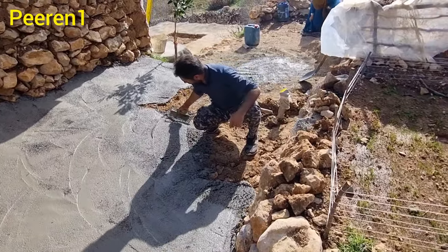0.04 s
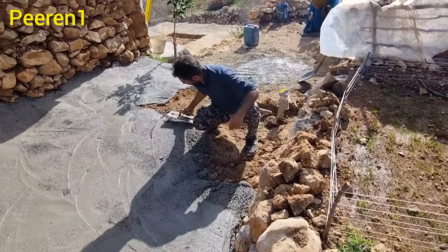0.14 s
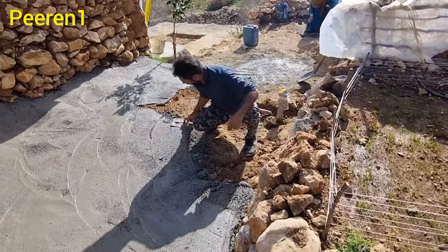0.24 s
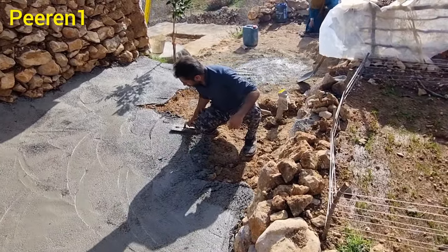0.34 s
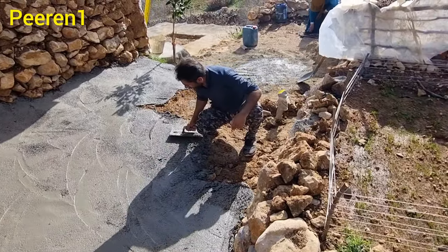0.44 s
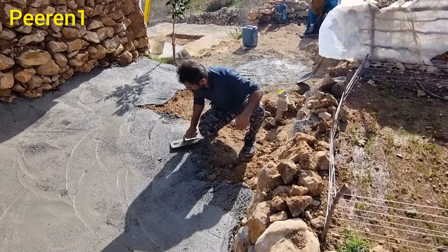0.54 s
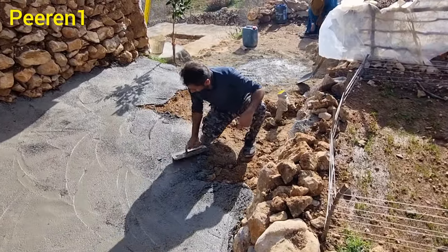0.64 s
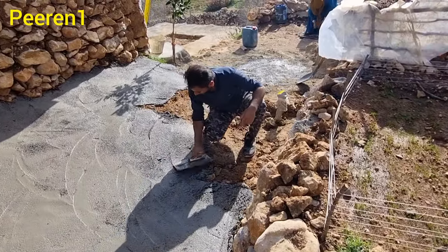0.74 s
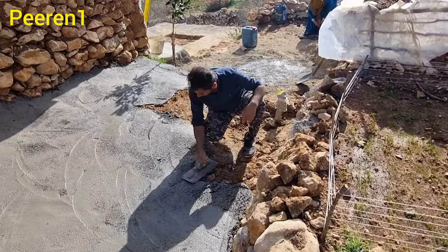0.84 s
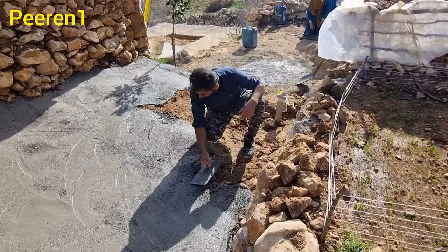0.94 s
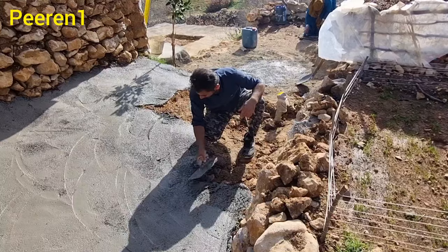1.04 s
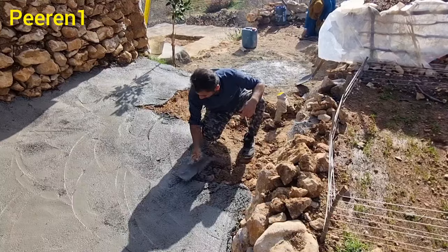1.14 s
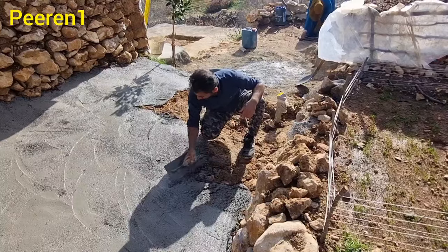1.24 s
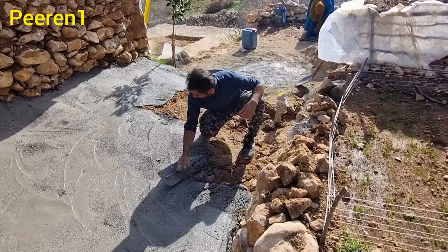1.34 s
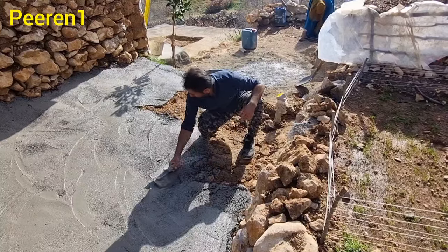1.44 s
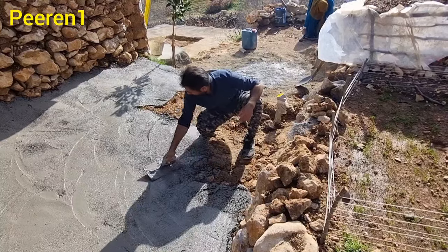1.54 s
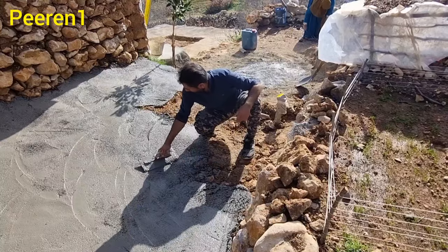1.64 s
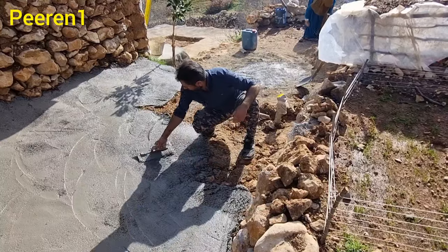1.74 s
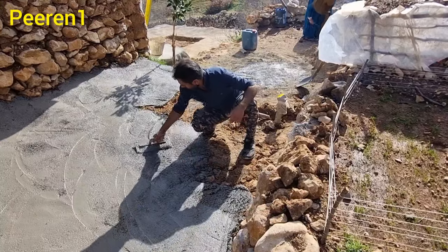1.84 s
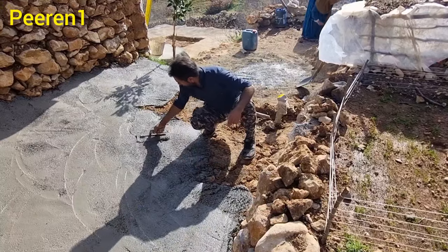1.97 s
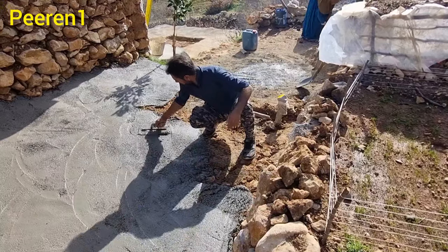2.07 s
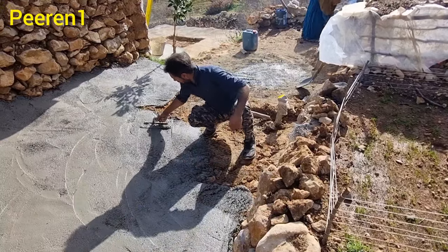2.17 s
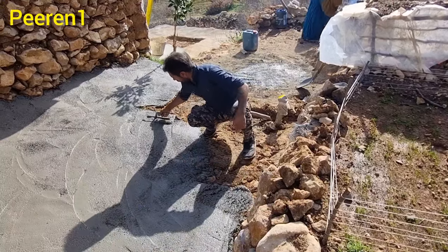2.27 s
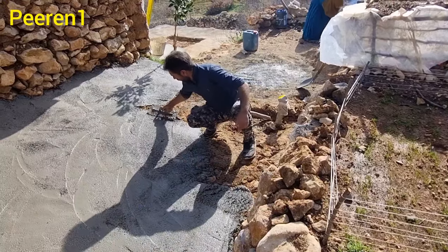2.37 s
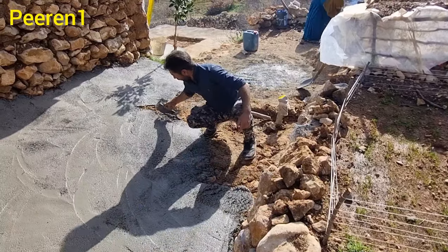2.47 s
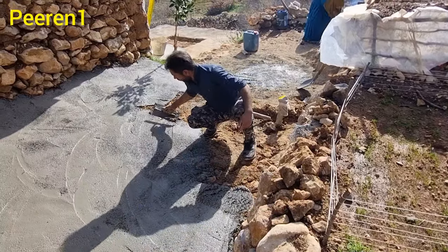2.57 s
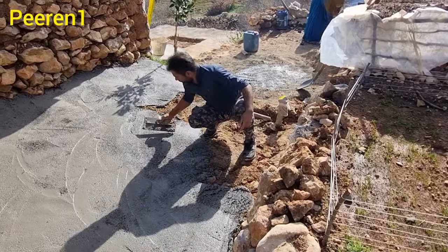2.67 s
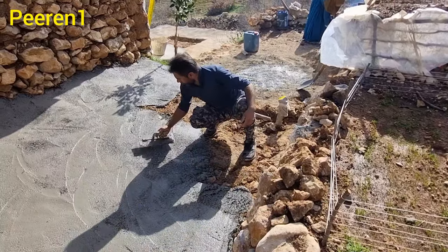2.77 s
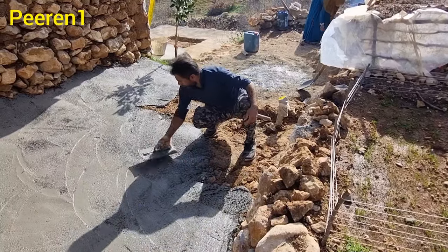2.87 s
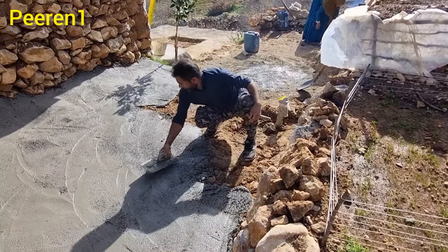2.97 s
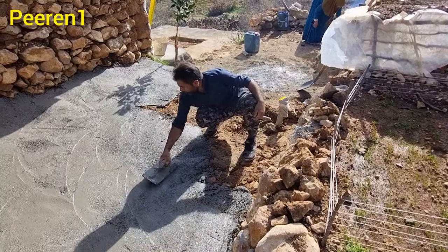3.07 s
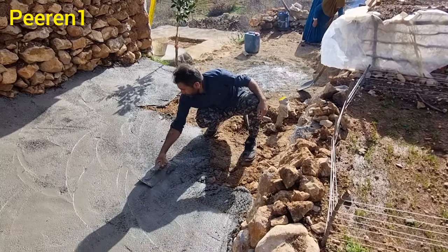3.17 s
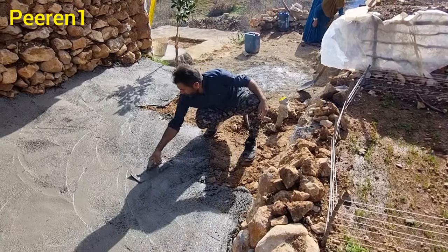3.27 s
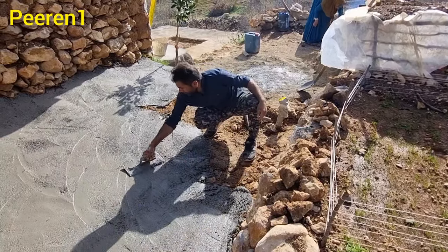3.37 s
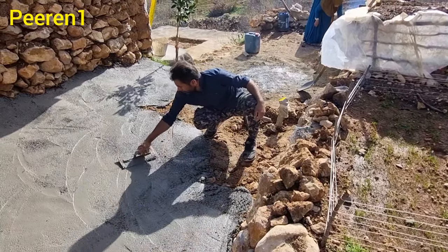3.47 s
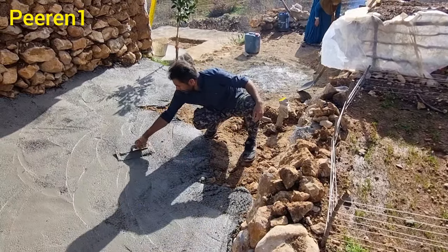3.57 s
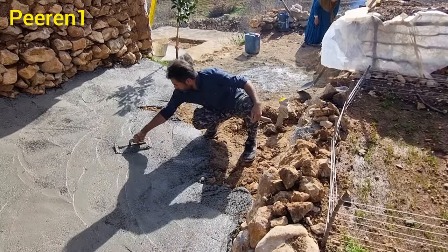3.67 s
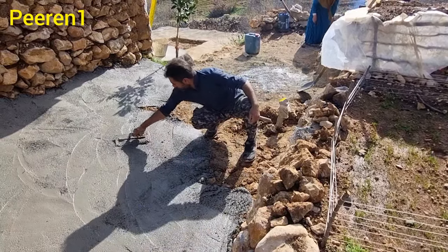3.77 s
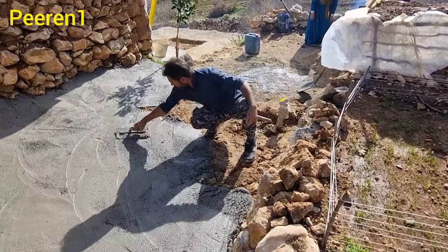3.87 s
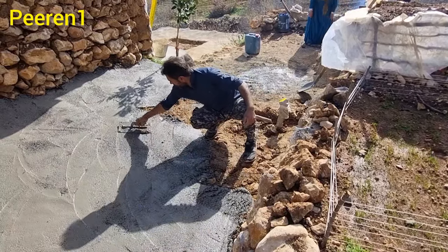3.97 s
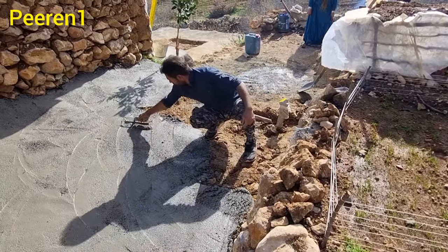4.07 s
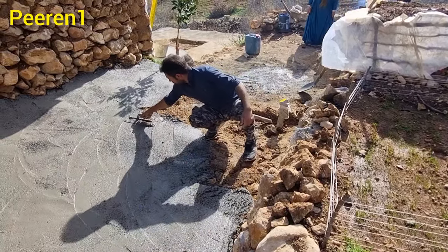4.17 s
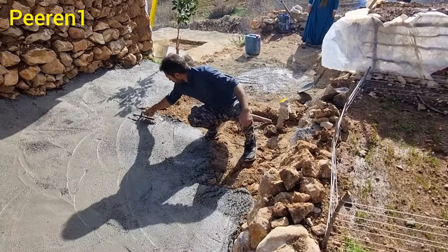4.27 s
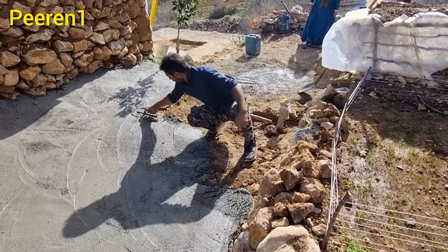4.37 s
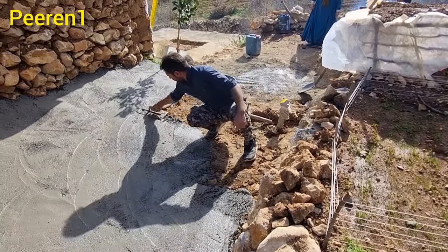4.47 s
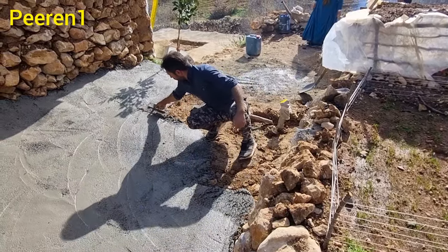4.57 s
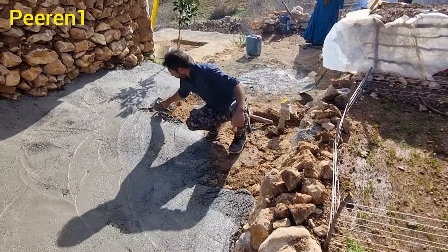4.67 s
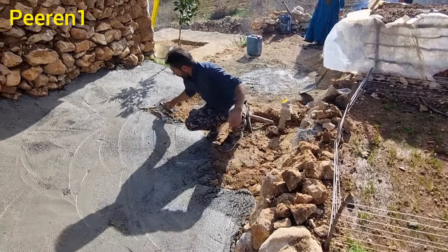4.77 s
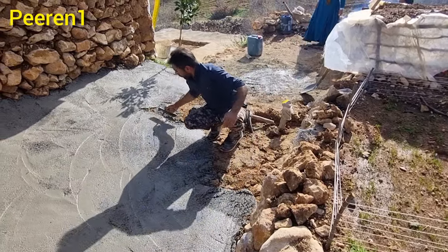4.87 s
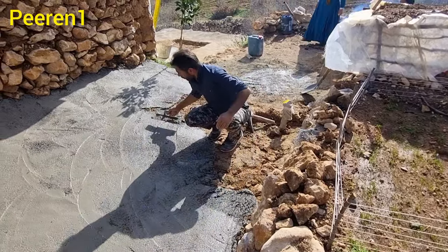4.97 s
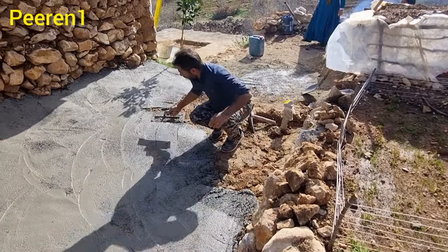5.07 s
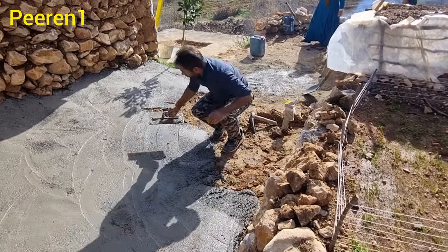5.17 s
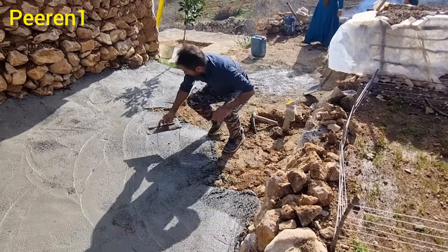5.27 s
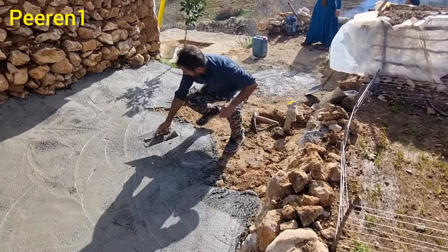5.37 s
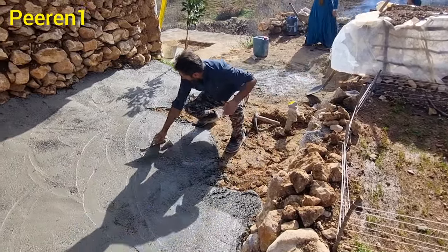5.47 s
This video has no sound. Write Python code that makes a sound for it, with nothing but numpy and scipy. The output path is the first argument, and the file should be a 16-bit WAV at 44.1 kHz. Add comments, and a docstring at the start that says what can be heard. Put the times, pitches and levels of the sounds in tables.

```python
"""A steel trowel sweeps wet cement outdoors, a few metres from two microphone ports.
Over a distant rumble, low hum and thin hiss (shaped noise), one sweep ends and another follows: random
clicks, as of sand grains, pass through blade-shaped bands. After faint rustles and tinkles a third sweep
follows; then the lifted steel tinkles, as decaying tones struck at random, until the hand stills it.
A fourth long sweep and more rustles follow; at the end the blade slaps down with a snap and dull thumps."""
import sys
import numpy as np
from scipy import signal
from scipy.fft import rfft, irfft
from scipy.io import wavfile
from scipy.ndimage import uniform_filter1d

SR = 44100
rng = np.random.default_rng(int(sys.argv[2]) if len(sys.argv) > 2 else 0)


def master(y):
    """Save y as 16-bit WAV."""
    cut = np.clip(np.atleast_2d(y).T, -1, 1)
    pcm = np.round(cut * 32767)  # scale
    wavfile.write(sys.argv[1], SR, pcm.astype(np.int16))


N = 242991  # length [samples]
HOP, SIZE = 128, 512  # step and length of a short analysis frame [samples]
HZ = np.fft.rfftfreq(SIZE, 1 / SR)[:, None]  # the pitches inside a frame [Hz]


def gain_of(db):
    """Turns decibels into a plain multiplier."""
    return 10 ** (np.asarray(db) / 20)


def evened(x, axis=None):
    """Scales a signal so that its average strength (rms) is 1."""
    return x / np.sqrt(np.mean(x ** 2, axis, keepdims=True) + 1e-20)


def read(points, hz):
    """Reads a table between its points, on a log-frequency axis."""
    f, value = np.transpose(points)
    return np.interp(np.log(hz + 1), np.log(f + 1), value)


def add(mix, s, sound):
    """Mixes a stereo sound in, starting at s seconds."""
    part = mix[:, round(s * SR):][:, :sound.shape[1]]
    part += sound[:, :part.shape[1]]


def bell(hz, centre_hz, octaves):
    """A bell-shaped band: 1 at its centre, fading by musical distance."""
    return np.exp(-.5 * (np.log2((hz + 1) / centre_hz) / octaves) ** 2)


def swell(t, top_s, rise_s, fall_s):
    """A smooth rise to 1 at top_s and a smooth fall."""
    return np.exp(-.5 * ((t - top_s) / np.where(t < top_s, rise_s, fall_s)) ** 2)


def patches(shape, bins, frames):
    """Random blotches over frequency and time, rms 1."""
    wide = uniform_filter1d(rng.standard_normal(shape), size=bins, axis=0)
    return evened(uniform_filter1d(wide, size=frames, axis=1))


# colour of each microphone port: (frequency [Hz], level [dB])
LEFT = [(450, -11), (650, 6), (950, 1.5), (1450, -1), (1850, 0), (2250, -3), (3300, 1.6), (5000, 4),
        (5900, -2.5), (8000, 3), (9000, -13), (10200, -11.5), (12500, -8.5), (15500, -6)]
RIGHT = [(450, -10.5), (650, 2.8), (950, 1), (1650, -4.5), (2200, 1), (3200, -6), (4800, 4), (6800, -4),
         (8100, -0.1), (9600, -7), (11400, -6.5), (12900, -0.3), (14500, -4.5), (15500, -6.5)]


def ports(hz):
    """How strongly the left and right port pass each frequency."""
    return gain_of([read(LEFT, hz), read(RIGHT, hz)])


def heard(shape):
    """A spectrum as both ports colour it, average power 1 in every frame."""
    both = shape * ports(HZ)
    return both / np.sqrt(np.mean(both ** 2, (0, 1), keepdims=True))


# how alike the two ports hear the blade: (frequency [Hz], likeness [0 to 1])
SAME = [(300, .9), (900, .93), (1500, .7), (2200, .7), (3600, .35), (5000, .55), (6500, .3), (8400, .5),
        (11000, .3)]
# how far the left port is ahead: (frequency [Hz], lead [radians])
LEAD = [(0, 0.45), (1000, 1.14), (1500, 1.9), (1900, 0.04), (2500, 3.5), (4000, 9.5), (5200, 10.17),
        (8300, 16.87), (16000, 28.7)]


def pair(z):
    """Second port: partly the same sound a little later, partly sound from other paths."""
    same = np.clip(read(SAME, HZ), 0, 1)
    late = np.exp(-1j * np.interp(HZ, *np.transpose(LEAD)))
    return np.array([z[0], same * late * z[0] + np.sqrt(1 - same ** 2) * z[1]])


def grains(n, per_s, spread_db, hiss):
    """Spectra of two trains of clicks of uneven size over a bed of finer sand (steady noise)."""
    size = gain_of(spread_db * np.minimum(rng.exponential(1, (2, n)), 5))
    size = size * rng.choice([-1, 1], (2, n))
    clicks = evened(size * (rng.random((2, n)) < per_s / SR))
    x = clicks + hiss * rng.standard_normal((2, n))
    return signal.stft(evened(x), nperseg=SIZE, noverlap=SIZE - HOP)[2]


# colour of the thin hiss, before it is set to AIR_DB: (frequency [Hz], relative level [dB per Hz])
AIR = [(76, -17.5), (130, -13.5), (206, -12), (263, -14), (321, -14), (443, -24), (586, -19), (635, -23.5),
       (1260, -27.5), (2390, -26), (2920, -28), (3430, -29.5), (15800, -22.5)]
AIR_DB = -74.5  # hiss level [dB]
# how alike the two ports hear the background: (frequency [Hz], likeness [0 to 1])
AIR_SAME = [(60, .94), (250, 0.68), (700, 0.21), (1400, .1)]
# background balance: (frequency [Hz], left minus right [dB])
AIR_BALANCE = [(50, 6), (125, 6.5), (250, 0.5), (500, -1)]
# the rumble coming and going: (time [s], level [dB])
RUMBLE = [(0.0, -65), (0.07, -74), (0.35, -59.5), (0.46, -73), (0.64, -57), (0.72, -68.5), (0.81, -58),
          (0.95, -71), (1.41, -66.5), (2.52, -66.5), (3.13, -76), (3.56, -64.5), (4.16, -68), (4.68, -78.5),
          (4.74, -68), (5.11, -84), (5.27, -70), (5.405, -77), (5.435, -58), (5.51, -64)]
# colour of the rumble before its level is set: (frequency [Hz], relative level [dB per Hz])
RUMBLE_TONE = [(12, -60), (20, -17), (43, -2), (59, 4), (124, -3.5), (170, -18.5), (220, -39), (370, -120)]
HUM_HZ, HUM_SHARE = 60.6, 0.43  # wavering hum in the rumble: centre [Hz], gain added to its colour


def air():
    """Noise filtered into a swelling distant rumble with a low hum, and a thin hiss."""
    hz, frames = np.fft.rfftfreq(4096, 1 / SR)[:, None], N // 1024 + 5
    a, b, c, d = rng.standard_normal((frames, len(hz), 4)).T
    same, left = np.clip(read(AIR_SAME, hz), 0, 1), a + 1j * b
    z = np.array([left, same * left + np.sqrt(1 - same ** 2) * (c + 1j * d)])
    left_gain, right_gain = ports(hz)
    side = np.sqrt(left_gain / right_gain) * gain_of(read(AIR_BALANCE, hz) / 2)
    z *= np.array([side, 1 / side])
    hiss = gain_of(read(AIR, hz) + 1.85 * patches(left.shape, bins=40, frames=3))
    hiss *= ports(np.maximum(hz, 4000)).mean(0)  # the ports colour the treble hiss too
    rumble = gain_of(read(RUMBLE_TONE, hz)) + HUM_SHARE / (1 + ((hz - HUM_HZ) / 7) ** 2)
    rumble_db = np.interp(np.arange(N) / SR, *np.transpose(RUMBLE))
    mix = 0
    for db, colour in ((AIR_DB, hiss), (rumble_db, rumble)):
        layer = signal.istft(z * colour, nperseg=4096, noverlap=3072)[1][:, :N]
        mix = mix + gain_of(db) * evened(layer)
    return mix


# faint rustles between strokes:
# (loudest time [s], level [dB], rise [s], fall [s], low scuff relative to the crackle [dB])
RUSTLES = [(1.05, -75.5, .12, .1, -20), (1.22, -67, 0.14, 0.066, -34), (1.388, -69, 0.019, 0.025, -39),
           (2.95, -75, 0.039, 0.033, -30), (3.075, -78, 0.059, .03, -20), (4.7, -76, 0.026, 0.025, -6),
           (4.78, -75, 0.037, 0.031, -4), (5.046, -76, 0.058, 0.046, -9), (5.259, -76, .05, .15, -15),
           (5.41, -75, 0.065, .02, -14)]


def rustle(top_s, db, rise_s, fall_s, scuff_db):
    """Light crackle of cloth and gravel as the worker shifts: clicks in a wide treble band."""
    z = grains(SR, per_s=1100, spread_db=2.0, hiss=1.2)
    crackle = heard(bell(HZ, 5670, 1.0) + .5 * bell(HZ, 9000, 0.75))
    scuff = gain_of(scuff_db) * heard(bell(HZ, 1800, 0.14))
    shape = (crackle + scuff) * gain_of(2.7 * patches(z.shape[1:], bins=12, frames=12))
    x = signal.istft(z * shape, nperseg=SIZE, noverlap=SIZE - HOP)[1][:, :SR]
    return top_s - .5, x * gain_of(db) * swell(np.arange(SR) / SR, 0.503, rise_s, fall_s)


def burst(s, db, t60, shape, apart):
    """A puff of coloured noise that dies by 60 dB in t60 s; apart sets how unlike the ports hear it."""
    t = np.arange(SR // 4) / SR
    x = rng.standard_normal((1, len(t))) + apart * rng.standard_normal((2, len(t)))
    x = evened(irfft(rfft(x) * shape(np.fft.rfftfreq(len(t), 1 / SR)), len(t)))
    onset = np.minimum(t / (.03 * t60), 1)
    return s, gain_of(db - 60 * t / t60) * x * onset


# dull thumps: (time [s], level the decay starts from [dB], time to fall 60 dB [s])
THUMPS = [(1.53, -56, 0.051), (2.346, -60, 0.13), (2.51, -62.5, 0.17), (4.749, -56.5, 0.1),
          (5.414, -49.5, 0.11), (5.437, -57.5, 0.25), (5.448, -65, 0.077)]


def thump(s, db, t60):
    """A dull thump through the ground: a dying puff of bass noise."""
    return burst(s, db, t60, lambda f: bell(f, 148, 0.72), apart=0.51)


# snaps: (time [s], level the decay starts from [dB], centre [Hz], time to fall 60 dB [s])
SNAPS = [(2.312, -29.5, 5800, 0.0077), (5.3263, -54, 3630, 0.01), (5.4206, -37, 7840, 0.014)]


def snap(s, db, centre_hz, t60):
    """A stone snapping under the edge: a very short puff of bright noise."""
    return burst(s, db, t60, lambda f: ports(f) * bell(f, centre_hz, 0.45), apart=1.6)


# bursts of tinkling steel: (time [s], level before ring and hiss are blended [dB],
# length scale of the chatter [s], centre [Hz], favoured mode [Hz], ring time factor of that mode)
TINKLES = [(1.313, -78, .01, 8500, 8274, 0.55), (1.384, -63.5, .01, 9180, 9544, .5),
           (1.387, -67, 0.0093, 11000, 13845, .5), (1.457, -53, 0.0078, 9150, 9544, 0.25),
           (2.486, -43.5, 0.038, 8400, 8600, 0.2), (2.507, -62, 0.017, 4230, 4586, 0.3),
           (2.501, -59, 0.024, 2440, 2290, 0.85), (2.502, -55, 0.014, 3630, 3500, 1.7),
           (2.54, -48.5, 0.029, 8050, 8274, 0.33), (2.558, -56.5, 0.056, 5500, 5130, 1.9),
           (2.635, -57, 0.068, 5600, 4100, 1.8), (2.672, -59, 0.02, 11200, 9377, 0.62),
           (2.677, -65, 0.13, 5800, 8274, 0.88), (2.787, -63, 0.0072, 10300, 9900, 0.54),
           (2.788, -61.5, 0.082, 5970, 5020, 3.5), (2.849, -60.5, 0.006, 11800, 13800, 5.4),
           (2.912, -65, 0.01, 8700, 8274, 1)]
# tones (modes) of the free blade, before each burst picks among them:
# (frequency [Hz], relative level [dB], time to fall 60 dB before the ring time factor [s])
STEEL = [(2290, -9, 0.1), (2650, -12, 0.1), (3332, -11, 0.25), (3418, -7, 0.25), (3929, -5, 0.25),
         (4231, -11, 0.25), (4586, -7, 0.25), (4936, 0, 0.25), (5044, -2, 0.25), (5302, -11, 0.25),
         (5722, -5, 0.25), (5840, -10, 0.25), (5953, -11, 0.25), (6120, -8, 0.25), (6745, -11, 0.25),
         (7100, -10, 0.25), (7332, -6, 0.25), (7671, -10, 0.25), (8274, -1, 0.25), (8650, -12, 0.25),
         (8801, -4, 0.25), (9377, -9, 0.25), (9544, -6, 0.25), (9733, -8, 0.25), (10276, -7, 0.25),
         (10524, -8, 0.25), (10858, -11, 0.25), (11084, -12, 0.25), (12796, -13, 0.25), (13571, -13, 0.25),
         (13845, -2, 0.25)]
TICK_OCTAVES, RATTLE_OCTAVES = 0.18, 0.94  # a short tick wakes few modes, a long rattle wakes many
RATTLE_S = 0.023  # chatter longer than this counts as a rattle [s]
OTHERS_RING = 0.74  # ring time factor of the modes that a burst does not favour
GRIP_S = 2.95  # the hand tightens and stills the steel [s]


def tinkle(s, db, length, centre_hz, favoured_hz, ring_time):
    """A short chatter rings the free steel; every mode is pinged at its own moments."""
    weak = rng.uniform((2200, -18, .12), (15700, -11, .22), (14, 3))  # a thin plate has many lesser modes
    hz, mode_db, t60 = np.vstack([STEEL, weak]).T[:, :, None]
    octaves = TICK_OCTAVES + (RATTLE_OCTAVES - TICK_OCTAVES) / (1 + (RATTLE_S / length) ** 10)
    t = np.arange(SR // 3) / SR
    chatter = (t / length) ** 3 * np.exp(-4 * t / length)

    strength = gain_of(mode_db) * (bell(hz, centre_hz, octaves) + 0.9 * bell(hz, favoured_hz, 0.011))
    struck = rng.random((len(hz), len(t))) < 900 / SR  # about 900 pings a second for each mode
    pings = chatter * rng.standard_normal((len(hz), len(t))) * struck
    ring_factor = OTHERS_RING + (ring_time - OTHERS_RING) * bell(hz, favoured_hz, 0.085)
    one_ping = gain_of(-60 * t / (t60 * ring_factor)) * np.exp(2j * np.pi * hz * t)
    modes = signal.fftconvolve(pings, one_ping, axes=1)[:, :len(t)]
    flicker = uniform_filter1d(uniform_filter1d(rng.standard_normal(modes.shape), size=500), size=300)
    modes *= strength / (abs(modes).max(1, keepdims=True) + 1e-9)
    modes *= gain_of(4.0 * evened(flicker))  # light contacts keep choking the ring

    left, right = ports(hz)
    phases = np.exp(2j * np.pi * rng.random((2, len(hz), 1)))
    sides = np.sqrt([left / right, right / left]) * phases
    grip = gain_of(-450 * np.maximum(s + t - GRIP_S, 0))  # a fast fade, in dB per second
    rung = (sides * modes).sum(1).real * grip

    f = np.fft.rfftfreq(len(t), 1 / SR)
    scrape = rfft(chatter * rng.standard_normal((2, len(t))))
    hissed = irfft(scrape * ports(f) * bell(f, centre_hz, 1.6 * octaves), len(t))
    hiss = np.clip(.16 + (db + 60) / 80, .1, .36)  # harder chatter scuffs more
    head = round((length + 0.05) * SR)  # levels are set on the loud first part
    mix = sum(w * x / x[:, :head].std() for w, x in ((1 - hiss, rung), (hiss, hissed)))
    return s, gain_of(db) * mix


# one list for each stroke: (time [s], level of the grit [dB],
# low blade band relative to the grit [dB], treble tilt before the ports colour it [dB per octave])
STROKES = [
    [(0.0, -55, -8, 2.5), (0.085, -93, -13, -4)],
    [(0.225, -86, -9, 4), (0.249, -45.5, -15, -2), (0.395, -38, -35, -4), (0.557, -32.5, -22, -1.5),
     (0.709, -36.5, -18.5, -0.5), (0.811, -34, -24.5, -1), (0.857, -42.5, -13, 1.5), (0.895, -46.5, -27, 3),
     (0.96, -83, -4, 0)],
    [(1.39, -70.5, -33, 0.5), (1.432, -44, -12, 1), (1.524, -41.5, -19.5, 0.5), (1.62, -39, -9, 1),
     (1.8, -37.5, -12.5, 0), (1.966, -40, -18.5, 0), (2.114, -40.5, -19.5, -1), (2.3, -42, -14, -1.5),
     (2.42, -49.5, -14, 0.5), (2.47, -72, -10, 1)],
    [(3.11, -82, -15, 4), (3.132, -54, -14, -1), (3.268, -40, -14.5, 0), (3.58, -40, -11.5, 0.5),
     (3.822, -42, -14.5, 0.5), (4.05, -46.5, -10.5, 0), (4.264, -45.5, -19.5, -1.5), (4.44, -45, -13.5, -3),
     (4.636, -52.5, -11, 0), (4.7, -85, -21, 2)],
    [(5.413, -60, -9, -3), (5.421, -48.5, -14.5, -2), (5.439, -57, -6, -2), (5.51, -73.5, -12, 0.5)],
]
# the edge digs in for a moment and the blade hums: (time [s], rise and fall [s],
# hum relative to the grit [dB], hum centre [Hz], low drag relative to the grit [dB])
DIGS = [(0.3, 0.037, -13.5, 680, -25.5), (0.427, 0.033, -17.5, 1210, -55), (0.58, 0.045, -9.5, 796, -33),
        (0.635, 0.048, -10.5, 800, -23.5), (0.674, 0.043, -8, 1290, -25.5), (0.854, 0.026, -23, 1060, -23),
        (1.537, 0.022, -16, 633, -16), (1.744, 0.032, -7, 750, -22.5), (1.854, 0.034, -8.5, 730, -33),
        (2.038, 0.12, -11, 960, -34.5), (2.32, 0.019, -6, 690, -28), (3.47, 0.02, -8.5, 870, -24.5),
        (3.58, .04, -17, 740, -27), (3.742, .05, -20, 820, -29), (3.916, 0.043, -10.5, 732, -26),
        (4.046, 0.036, -15, 1080, -22.5), (4.187, 0.034, -5, 914, -26), (4.256, 0.037, -8.5, 1120, -40),
        (4.374, 0.039, -14, 1120, -20), (4.56, 0.035, -11.5, 680, -25)]
LOW_HZ, UPPER_HZ = 769, 1168  # main centres of the pressed blade's two body bands [Hz]
UPPER_DB, DRAG_DB = -15, -33.5  # upper band and resting low drag, relative to the grit [dB]


def stroke(rows):
    """Grains click into the pressed blade: grit, two body bands and a drag that swells as the edge digs in."""
    s, grit_db, low_db, tilt_db = np.transpose(rows)
    n = round((s[-1] - s[0]) * SR)
    z = grains(n, per_s=5000, spread_db=2.0, hiss=1.31)
    t = s[0] + np.arange(z.shape[2]) * HOP / SR

    tilt = gain_of(np.interp(t, s, tilt_db) * np.log2((HZ + 1) / 5000))
    grit = heard(tilt / (1 + (1620 / (HZ + 1)) ** 12))  # the divisor takes the bass out
    low = gain_of(np.interp(t, s, low_db)) * heard(bell(HZ, LOW_HZ, 0.48) + 0.8 * bell(HZ, 800, 0.35))
    upper = gain_of(UPPER_DB) * heard(bell(HZ, UPPER_HZ, 0.2) + 1.2 * bell(HZ, 1313, 0.18))

    body, drag = low ** 2 + upper ** 2, gain_of(DRAG_DB) ** 2  # powers, so that they add up
    for at, length, hum_db, hum_hz, drag_db in DIGS:
        dig = swell(t, at, length, length)
        body = body + (dig * gain_of(hum_db) * heard(bell(HZ, hum_hz, 0.2))) ** 2
        drag = drag + (dig * gain_of(drag_db)) ** 2

    judder = gain_of(0.71 * patches(z.shape[1:], bins=3, frames=9))  # the blade sticks and slips
    power = grit ** 2 + judder ** 2 * body + drag * heard(bell(HZ, 245, 0.59)) ** 2
    blotch = gain_of(2.63 * patches(z.shape[1:], bins=2, frames=40))  # damped blade modes come and go
    spectrum = pair(z) * np.sqrt(power) * blotch
    x = signal.istft(spectrum, nperseg=SIZE, noverlap=SIZE - HOP)[1][:, :n]
    return s[0], x * gain_of(np.interp(s[0] + np.arange(n) / SR, s, grit_db))


def scene():
    """All sources at the two ports, from the background to the strokes."""
    mix = air()
    for row in RUSTLES:
        add(mix, *rustle(*row))
    for row in THUMPS:
        add(mix, *thump(*row))
    for row in SNAPS:
        add(mix, *snap(*row))
    for row in TINKLES:
        add(mix, *tinkle(*row))
    for rows in STROKES:
        add(mix, *stroke(rows))
    return mix


EDGE_HZ = 15800  # upper limit of the sound [Hz]


def record(dry):
    """Cuts off everything above the upper limit."""
    low_pass = signal.firwin(1023, EDGE_HZ, window=("kaiser", 9), fs=SR)
    return signal.oaconvolve(dry, low_pass[None], "same")


dry = scene()
out = record(dry)
master(out)
```